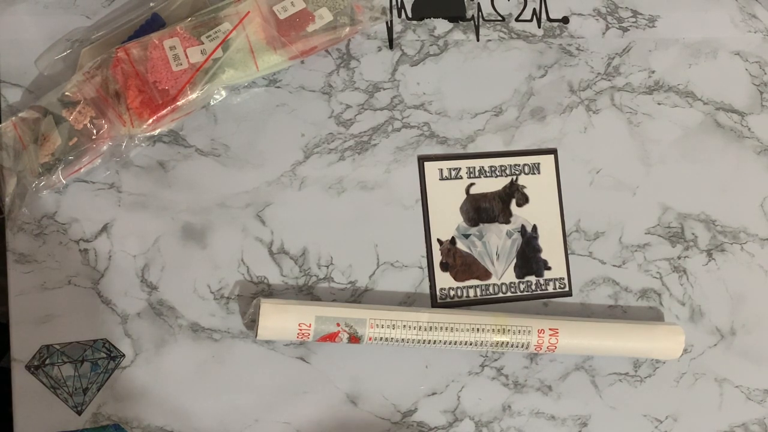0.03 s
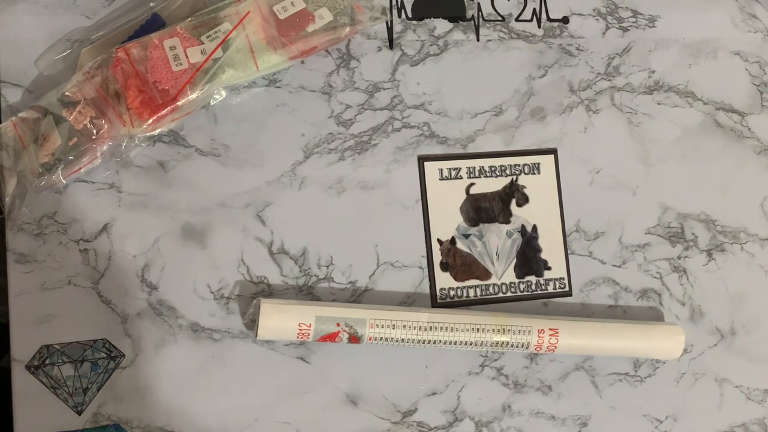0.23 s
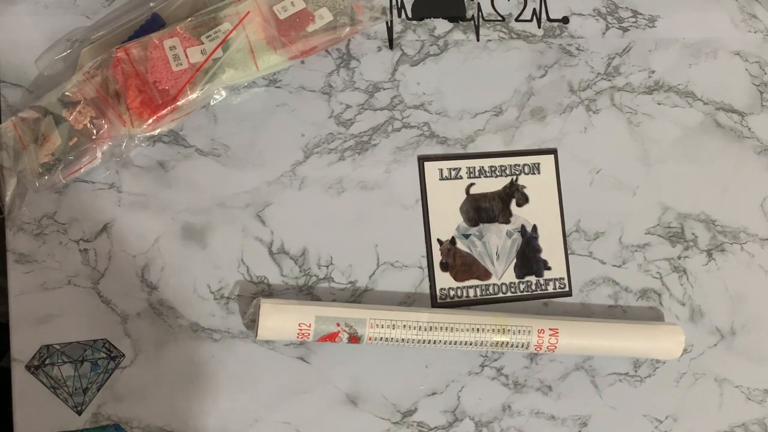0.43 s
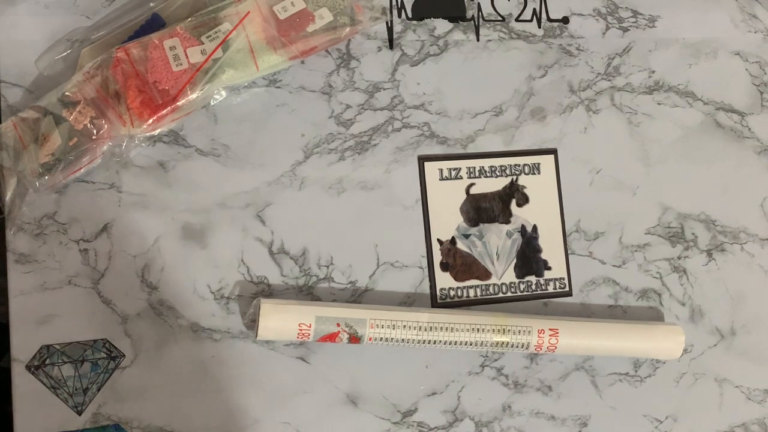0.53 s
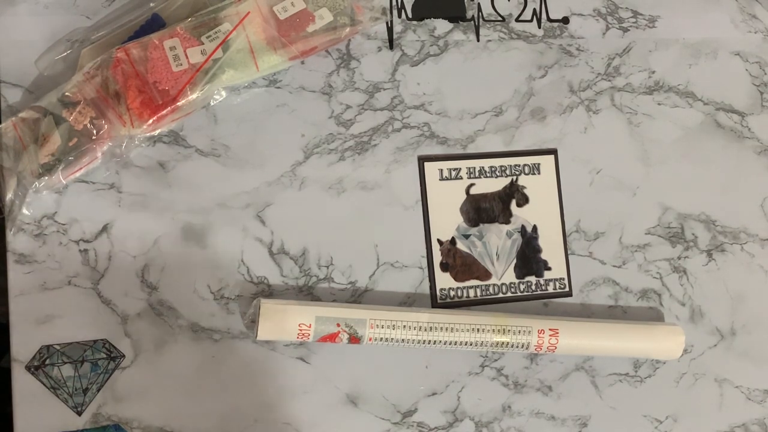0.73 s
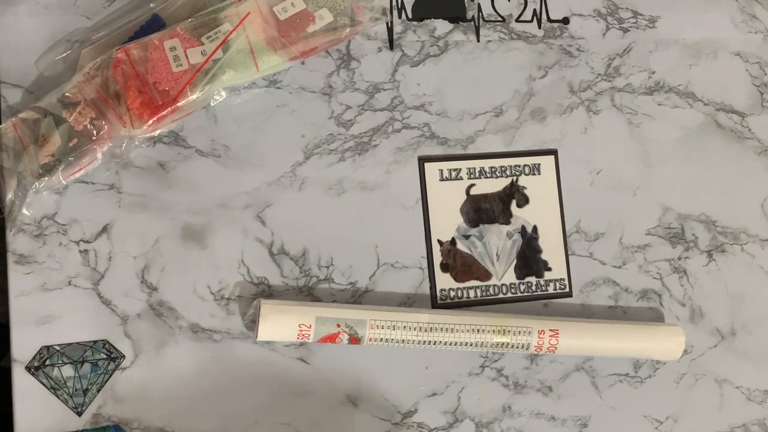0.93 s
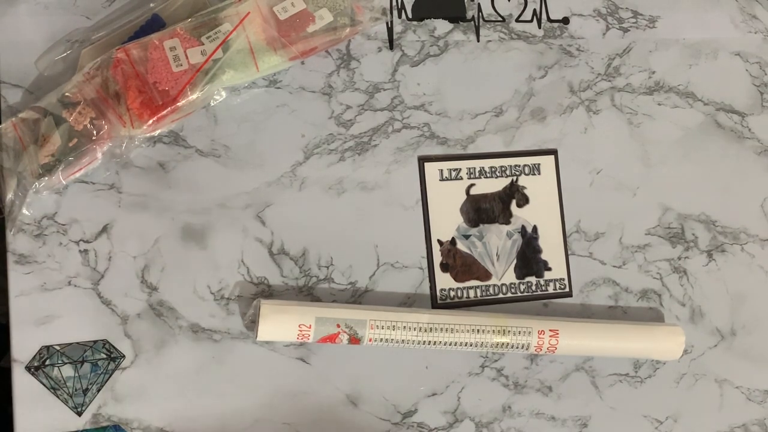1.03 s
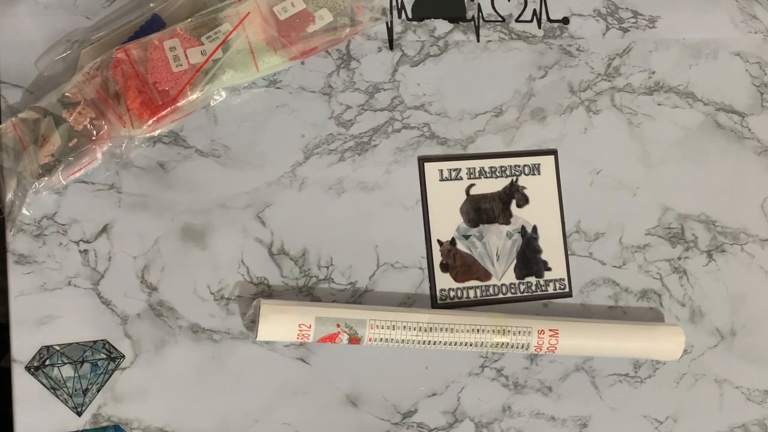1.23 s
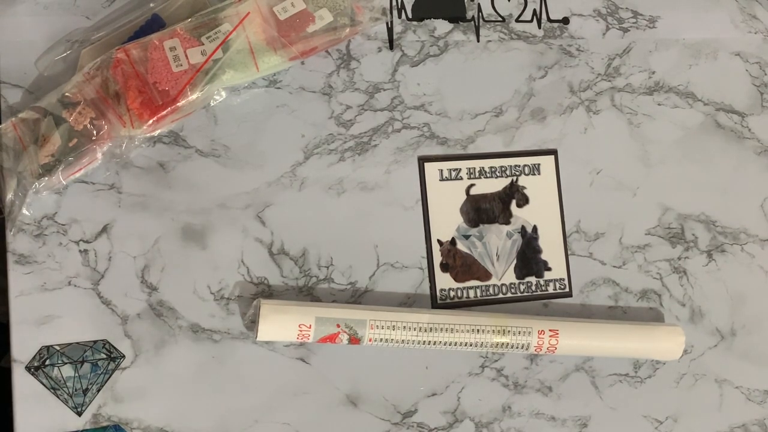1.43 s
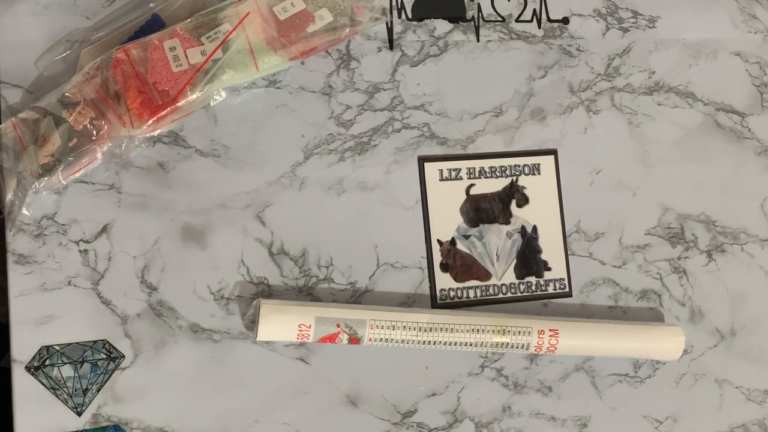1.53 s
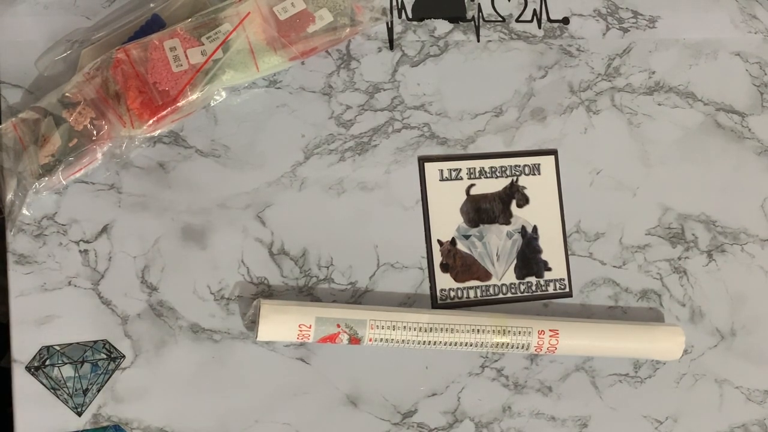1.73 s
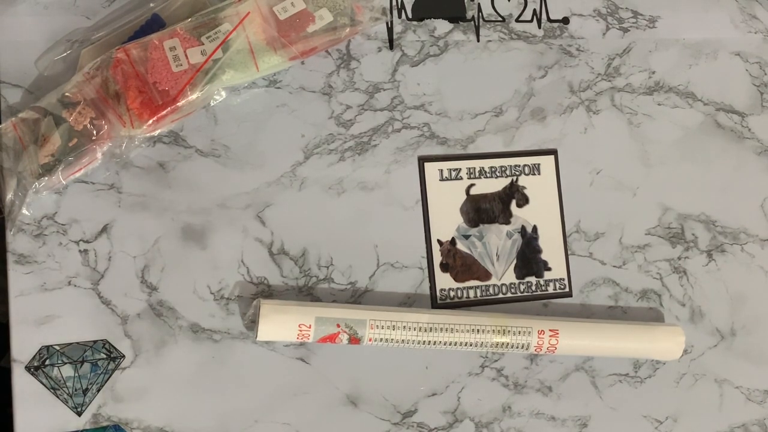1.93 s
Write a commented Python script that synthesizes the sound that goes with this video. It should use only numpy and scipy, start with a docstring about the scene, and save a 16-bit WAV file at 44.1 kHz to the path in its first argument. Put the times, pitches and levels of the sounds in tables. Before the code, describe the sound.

Desk drawer in a small quiet room, heard by a phone on the desk. Small hard things clatter from the start, loudest in a bright crack at 0.2 s, thinning to ticks by 0.6 s. From 0.7 s the wooden box rumbles and shudders, with faint squeaks near 0.85 s. Contents hiss and grate from 1.1 to 1.35 s; dull knocks cluster around 1.55-1.7 s, then it settles.

```python
"""Desk drawer, clattered and dragged

Small hard things clatter in a desk drawer, then the drawer is dragged, with a phone lying on the desk in a
small room. Clicks shake the modes of its wooden box into a rumble and a grating, and single knocks ring on it.
The contents slide with a hiss of filtered noise and squeak faintly; the box shudders, bumps and settles.
The quiet of the room lies underneath, and echo tails of decaying noise bring it all to two microphone ports."""
import sys
import numpy as np
from scipy import signal
from scipy.fft import rfft, irfft, next_fast_len
from scipy.io import wavfile
from scipy.ndimage import uniform_filter1d

SR = 44100
rng = np.random.default_rng(int(sys.argv[2]) if len(sys.argv) > 2 else 0)


def unload_wav(signal):
    """Save mono or channel-first audio to the path in sys.argv[1] as 16-bit WAV at rate SR, clipped to [-1, 1]."""
    wavfile.write(
        sys.argv[1],
        SR,
        np.round(np.clip(np.atleast_2d(signal).T, -1, 1) * 32767).astype(np.int16),
    )


N = 88200
T = np.arange(N) / SR
M = next_fast_len(2 * N)  # transform length, padded so that tails do not wrap round
HZ = np.arange(M // 2 + 1) * SR / M + 1e-3

FLICKER_PER_S, FLICKER_DB = 45, 2  # new levels per second, rms spread in dB; shared by hiss and grating

# Modes of the wooden box. Each row: frequency in Hz, width in Hz, relative level in dB.
BOX_MODES = [(66, 18, -12), (124, 20, -2), (165, 30, -9), (254, 22, -3), (390, 45, -10), (470, 40, -14),
             (560, 50, -12), (660, 50, -14), (786, 50, -11), (1000, 90, -14), (1300, 150, -16),
             (1700, 250, -20)]


def undb(db):
    """Turn dB into gain."""
    return 10 ** (np.asarray(db) / 20)


def unit(x):
    """Scale to an rms of one."""
    return x / np.sqrt(np.mean(np.abs(x) ** 2))


def through(x, response):
    """Filter by a complex frequency response."""
    return irfft(rfft(x, M) * response, M)[..., :N]


def colour(table):
    """Minimum-phase response with the gain of (Hz, dB) points, by folding the cepstrum onto positive time."""
    hz, db = np.array(table, float).T
    log_gain = np.interp(np.log(HZ), np.log(hz), db) * np.log(10) / 20
    cepstrum = irfft(log_gain, M)
    cepstrum[1:M // 2] *= 2
    cepstrum[M // 2 + 1:] = 0
    return np.exp(rfft(cepstrum))


def modes(table):
    """Sum of resonances with alternating signs."""
    total = 0
    for k, (hz, width_hz, db) in enumerate(table):
        damping = 1j * HZ * width_hz
        total = total + (-1) ** k * undb(db) * damping / (hz ** 2 - HZ ** 2 + damping)
    return total


def curve(table, column):
    """Gain over time, straight in dB between the rows of a level table."""
    rows = np.array(table, float)
    return undb(np.interp(T, rows[:, 0], rows[:, column]))


def grains(per_s, scatter_db):
    """Clicks at random times and signs, mostly small, a few large, at an rms of one."""
    u = rng.random((3, N))
    size_db = np.minimum(-scatter_db * np.log(u[1] + 1e-9), 3.5 * scatter_db)
    happens = u[0] < per_s / SR
    return unit(happens * undb(size_db) * np.sign(u[2] - .5))


def add(out, start_s, piece):
    """Mix a piece in at a time."""
    i = int(start_s * SR)
    out[i:i + len(piece)] += piece[:N - i]


def tilt(x, db_per_octave):
    """Lean the spectrum about 1.6 kHz; the 400 Hz offset flattens the slope in the bass."""
    shifted_hz = np.arange(len(x) // 2 + 1) * SR / len(x) + 400
    return irfft(rfft(x) * undb(db_per_octave * np.log2(shifted_hz / 2000)), len(x))


def walk(per_s):
    """Random levels with straight slews between them, at an rms of one."""
    step = max(int(SR / per_s), 201)  # samples
    held = np.repeat(rng.standard_normal(N // 200), step)[:N]
    return unit(uniform_filter1d(held, step))


def flicker():
    """Gain that wavers at random around one."""
    return undb(FLICKER_DB * walk(FLICKER_PER_S))


def quiet():
    """Quiet of the room: steady coloured noise, heaviest in the bass."""
    # Spectrum of the quiet. Each row: frequency in Hz, relative level in dB.
    quiet_spectrum = [(30, 1.5), (70, 7.5), (130, -10.5), (300, -12), (1000, -32), (3000, -31.5),
                      (8000, -36), (16000, -37.5)]
    return undb(-60.5) * unit(through(rng.standard_normal(N), colour(quiet_spectrum)))


def room():
    """Response of one echo tail: octave bands of noise, each dying at its own rate."""
    # Echo of the room. Each row: frequency in Hz, decay to -60 dB in seconds, relative level in dB.
    echo_table = [(60, .25, -16), (250, .25, -13), (600, .13, -2), (2000, .14, -4), (5000, .18, -8),
                  (12000, .12, -8)]
    rise_s = 0.00043
    t, tail = T[:SR // 2], 0
    table_hz, decay_s, db = np.array(echo_table).T
    for hz in 58.0 * 2. ** np.arange(9):
        band_shape = np.exp(-np.log2(HZ / hz) ** 2 * 2)
        band = through(rng.standard_normal(N), band_shape)[:len(t)]
        band_decay_s = np.interp(np.log(hz), np.log(table_hz), decay_s)
        decay = np.exp(-np.log(1000) * t / band_decay_s) * np.clip(t / rise_s, 0, 1)
        tail = tail + band * decay / np.sqrt(np.sum(decay ** 2))
    return rfft(tail, M) * undb(np.interp(np.log(HZ), np.log(table_hz), db))


def squeaks():
    """Short rough whistles of something rubbing: narrow bands of noise that swell and fade."""
    # Each row: start in seconds, length in seconds, pitch in Hz, rms level at the height of the swell in dB.
    squeak_rows = [(.738, .03, 3500, -69), (.843, .035, 4060, -57), (.913, .038, 3350, -63)]
    out = np.zeros(N)
    for start_s, length_s, hz, db in squeak_rows:
        band = unit(through(rng.standard_normal(N), modes([(hz, 350, 0)]) ** 2))
        swell = np.sin(np.pi * np.clip((T - start_s) / length_s, 0, 1))
        out += undb(db) * band * swell
    return out


def slide():
    """Contents slide over the drawer's floor: a fine, slightly gritty hiss, flickering in two bands."""
    # Strength of the hiss. Each row: time in seconds, relative level of the lower part in dB, of the treble in dB.
    slide_levels = [(.4, -72, -92), (.6, -71.5, -82.5), (.7, -74, -77), (.75, -68.5, -70),
                    (.84, -69, -69.5), (.89, -66.5, -73.5), (.93, -57.5, -73), (.97, -70, -79),
                    (1.02, -67.5, -75.5), (1.07, -61.5, -71.5), (1.11, -54, -60.5), (1.22, -52.5, -60.5),
                    (1.32, -55, -59), (1.35, -60, -66), (1.42, -61.5, -72.5), (1.45, -63, -71),
                    (1.53, -62.5, -65), (1.6, -65.5, -68.5), (1.65, -63.5, -73.5), (1.71, -72, -78.5),
                    (1.79, -71, -77.5), (1.83, -87.5, -100), (2, -99.5, -98)]
    # Colour of the hiss. Each row: frequency in Hz, relative level in dB.
    slide_spectrum = [(500, 0), (1200, -6), (2500, -4.5), (4000, -8.5), (5300, -10), (7300, -17),
                      (8800, -19.5), (11500, -22.5), (16000, -33.5)]
    treble_from_hz = 4600
    fine = rng.standard_normal(N) + .5 * grains(3000, 1.9)
    tint = colour(slide_spectrum)
    upper = 1 / (1 + (treble_from_hz / HZ) ** 6)
    lower = unit(through(fine, tint * (1 - upper))) * flicker()
    treble = unit(through(fine, tint * upper)) * flicker()
    lower *= undb(3.0) * curve(slide_levels, column=1)
    treble *= undb(2.0) * curve(slide_levels, column=2)
    fade_in = np.clip((T - .38) / .05, 0, 1)
    return fade_in * (lower + treble)


def clatter():
    """Each contact is a quick rattle of noise: it cracks, rings the struck thing and shakes the others."""
    # Contacts of hard things. Each row: start in seconds, relative level in dB, decay time to 1/e in seconds,
    # pitch of the struck thing in Hz, brightness in dB per octave.
    contacts = [(0.0248, -46.5, 0.023, 1920, 3), (0.038, -45.5, 0.011, 3400, -5.5),
                (0.053, -52, 0.051, 2950, 0.5), (0.0993, -41.5, 0.009, 1390, 5.5),
                (0.103, -27.5, 0.0076, 1370, -1.5), (0.114, -41, 0.033, 1600, 2),
                (0.129, -33, 0.015, 2540, 3.5), (0.136, -29, 0.0087, 3470, 3.5),
                (.139, -27.5, 0.0063, 1330, -9.5), (0.1465, -37.5, 0.0051, 3600, 5),
                (0.162, -44, 0.011, 3180, 6), (0.183, -36, 0.0096, 1880, 1.5),
                (0.1933, -12, 0.002, 1957, 0), (0.196, -6, 0.0018, 3080, 0.5),
                (0.204, -16, 0.0093, 1983, 1), (0.212, -29, 0.0042, 1054, -8.5),
                (0.225, -25.5, 0.0096, 2920, 0.5), (0.243, -36.5, 0.015, 1824, 3.5),
                (0.261, -38.5, 0.0042, 1580, -1), (0.33, -41, 0.024, 1940, 0.5),
                (0.338, -41, 0.0043, 3300, 4.5), (0.353, -34.5, 0.007, 3520, -4),
                (0.362, -38.5, 0.0073, 3560, -1), (0.38, -50.5, 0.016, 3100, -1),
                (0.483, -48, 0.0029, 1500, -2), (0.5146, -37, 0.0023, 1658, -6.5),
                (0.533, -45.5, 0.0077, 1430, -8), (0.587, -43.5, 0.0025, 810, -13.5),
                (1.493, -44, 0.0099, 1015, -1), (1.61, -47, 0.011, 3710, 3.5),
                (1.654, -40.5, 0.0026, 1570, -17)]
    # What the things ring with together. Each row: frequency in Hz, width in Hz, relative level in dB.
    thing_modes = [(430, 73, 0), (760, 36, -10.5), (1035, 40, -8.5), (1540, 50, -8), (1930, 31, 5),
                   (1856, 110, 19.5), (2204, 150, 7.5), (2380, 70, -7), (2596, 37, -16), (2780, 80, 16),
                   (3214, 120, 12), (3657, 180, 2.5), (5370, 505, -5), (7620, 240, -15.5)]
    # Broad crack of the contact. Each row: frequency in Hz, relative level in dB.
    crack_spectrum = [(150, -7.5), (400, -10), (1000, -8), (2500, -5), (4500, -5), (8000, -17),
                      (12000, -22), (16000, -32.5)]
    lead_in_s, rise_s = .005, .0003
    ring_cycles = 6.5  # cycles of the struck thing until its ring falls to 1/e
    things_from_hz = 190  # bass cut of the shared ring and the crack
    hits, own_rings, t = np.zeros(N), np.zeros(N), T[:4096] - lead_in_s
    for start_s, db, length_s, hz, bright_db in contacts:
        u = rng.standard_normal((2, len(t)))
        shape = np.clip(t / rise_s, 0, 1) * np.exp(-np.maximum(t, 0) / max(length_s, .0008))
        burst = undb(db) * shape * u[0] * undb(0.49 * u[1])
        ring = np.sin(2 * np.pi * hz * T[:800]) * np.exp(-T[:800] * hz / ring_cycles)
        add(hits, start_s - lead_in_s, tilt(burst, bright_db))
        add(own_rings, start_s - lead_in_s, np.convolve(burst, ring / np.sqrt(np.sum(ring ** 2))))
    body = unit(modes(thing_modes)) + unit(colour(crack_spectrum))
    bass_cut = (1j * HZ / (things_from_hz + 1j * HZ)) ** 2
    return undb(-10) * through(hits, body * bass_cut) + undb(-8.5) * own_rings


def knocks():
    """A dull thing rings unevenly at its pitch and rattles on the wood; the box thuds."""
    # Knocks inside the drawer. Each row: start in seconds, relative level in dB, pitch of the knocked thing in Hz,
    # relative level of the box's thud in dB.
    knock_rows = [(.029, -43.5, 756, -73), (0.114, -37, 455.6, -41.5), (.135, -30.5, 409, -45.5),
                  (.158, -45, 415, -38.5), (0.199, -31, 479, -45), (.205, -21.5, 985, -64),
                  (.222, -35.5, 416, -41), (0.244, -40, 173.3, -46), (0.341, -42, 360, -66),
                  (.360, -43, 379, -56), (0.393, -50, 383, -63), (0.478, -48.5, 980, -78),
                  (.522, -34, 828, -41.5), (0.534, -70, 466, -42), (.589, -51.5, 720, -52),
                  (.889, -37.5, 905, -31.5), (.940, -43, 805, -32.5), (0.992, -44, 770, -35),
                  (1.012, -38.5, 822, -39), (1.044, -34, 262.8, -32), (1.164, -40, 249, -63),
                  (1.299, -35, 784, -43), (1.43, -42, 777, -44.5), (1.489, -38, 770, -43),
                  (1.543, -36.5, 740, -31), (1.568, -26.5, 780, -28), (1.580, -33.5, 387, -29.5),
                  (1.592, -38.5, 374, -40), (1.61, -43, 437, -30.5), (1.654, -42, 418, -34),
                  (1.684, -44, 337, -33), (1.734, -46.5, 362, -59), (1.896, -50, 452, -64)]
    ring_cycles = 41.7  # cycles until the ring is 60 dB down
    swell_s, push_s, rattle_s = 0.003, 0.0037, 0.022
    rings, pushes, rattle, t = np.zeros(N), np.zeros(N), np.zeros(N), T[:6000]
    swell = 1 - np.exp(-t / swell_s)
    push = np.sin(np.pi * np.clip(t / push_s, 0, 1)) ** 2
    for start_s, db, hz, thud_db in knock_rows:
        u = rng.standard_normal((2, len(t)))
        waver = np.cumsum(u[1]) * .018  # random drift of the phase, radians
        decay = np.exp(-np.log(1000) * t * hz / ring_cycles)
        add(rings, start_s, undb(db) * swell * decay * np.sin(2 * np.pi * hz * t + waver))
        add(pushes, start_s, undb(thud_db) * push)
        add(rattle, start_s, undb(db - 8) * swell * np.exp(-t / rattle_s) * u[0])
    box = modes(BOX_MODES)
    thuds = undb(18) * through(pushes, box * HZ / (HZ + 200))
    wood_rattle = undb(24.5) * through(rattle, box * HZ / (HZ + 600))
    return rings + thuds + wood_rattle


def shudders():
    """The dragged box shudders in its runners: its main mode swells for a few cycles and stops."""
    # Each row: start in seconds, length in seconds, pitch in Hz, peak level in dB.
    shudder_rows = [(0.733, 0.02, 122, -43), (.785, 0.051, 114, -38.5), (.845, 0.037, 116, -34),
                    (.992, 0.052, 121, -36), (1.04, 0.033, 123, -37), (1.585, 0.043, 125, -39),
                    (1.633, 0.064, 133.6, -39), (1.681, 0.026, 97, -57), (1.75, 0.036, 110, -46.5)]
    out = np.zeros(N)
    for start_s, length_s, hz, db in shudder_rows:
        swell = np.sin(np.pi * np.clip((T - start_s) / length_s, 0, 1))
        tone = np.sin(2 * np.pi * hz * (T - start_s) + 6 * rng.random())
        out += undb(db) * swell * tone
    return out


def drag():
    """Bumps in the runners shake the low modes of the box; finer grit grates in the upper ones."""
    # Drag of the box. Each row: time in seconds, relative level of the rumble in dB, of the grating in dB.
    drag_levels = [(0.0, -80, -77), (0.03, -102, -67.5), (0.26, -68, -42.5), (0.32, -70, -65),
                   (0.37, -81, -73), (0.4, -70, -80), (0.54, -48, -68.5), (0.61, -54.5, -82),
                   (0.72, -45, -76), (0.76, -41, -82), (0.78, -44, -60.5), (0.86, -39, -55.5),
                   (0.98, -40.5, -54.5), (1.0, -46, -58), (1.06, -51, -52.5), (1.08, -36, -51),
                   (1.13, -50, -51), (1.15, -42.5, -51), (1.21, -47.5, -56.5), (1.32, -45, -55),
                   (1.41, -63, -59.5), (1.44, -44, -53), (1.51, -46.5, -58.5), (1.58, -40, -49),
                   (1.62, -46, -48.5), (1.69, -37.5, -66), (1.77, -51.5, -67), (1.83, -60, -74),
                   (1.96, -54.5, -87.5), (2.0, -55.5, -80)]
    bumps_per_s, bump_scatter_db = 370, 1.5
    grits_per_s, grit_scatter_db = 900, 4
    split_hz = 255
    box = modes(BOX_MODES)
    upper = 1 / (1 + (split_hz / HZ) ** 4)
    rumble = unit(through(grains(bumps_per_s, bump_scatter_db), box * (1 - upper)))
    grating = unit(through(grains(grits_per_s, grit_scatter_db), box * upper))
    rumble *= undb(-4.0) * curve(drag_levels, column=1)
    grating *= flicker() * curve(drag_levels, column=2)
    return rumble + grating


def scene():
    """All sources and the quiet, with the room's echo, at the two microphone ports."""
    # The microphone pair. Each row: frequency in Hz, lead of the left in radians, left over right in dB,
    # share of the echo that differs between the sides (0 to 1).
    port_table = [(30, 0, -1, 0.049), (215, 0, -1, 0.3), (400, 0.03, -6.5, 0.73), (864, -0.6, -3, 0.96),
                  (1400, 0.97, -0.5, 0.73), (2500, 1.5, -0.8, 0.52), (3450, 1.23, 2.5, 1),
                  (4700, 3.1, 0, .4), (6400, 5.9, 0, .7), (9200, 9.4, 0, .4), (11300, 12.7, 0, .8),
                  (13400, 15.7, 0, .5), (15200, 19, 0, .8)]
    dry = quiet() + squeaks() + slide() + clatter() + knocks() + shudders() + drag()
    hz, lead, left_db, apart = np.array(port_table).T
    lead, left_db = np.interp(HZ, hz, lead), np.interp(HZ, hz, left_db)
    apart = np.interp(HZ, hz, np.clip(apart, 0, 1))
    echo = np.sqrt(1 - apart ** 2) * room() + apart * np.array([room(), room()])
    side = np.array([[1], [-1]])  # left, right
    port = undb(side * left_db / 2) * np.exp(1j * side * lead / 2)
    return through(dry, port * (1 + echo))


def record(dry):
    """The phone cuts the deepest bass and the top."""
    bottom_hz, top_hz = 51.6, 16000
    bass_cut = signal.butter(3, bottom_hz, "high", fs=SR, output="sos")
    top_cut = signal.ellip(10, .2, 70, top_hz, fs=SR, output="sos")
    return signal.sosfilt(top_cut, signal.sosfilt(bass_cut, dry))


dry = scene()
out = record(dry)
unload_wav(out)
```